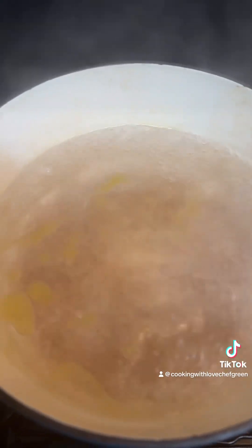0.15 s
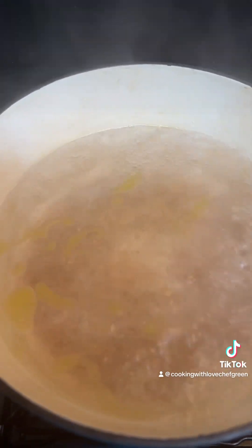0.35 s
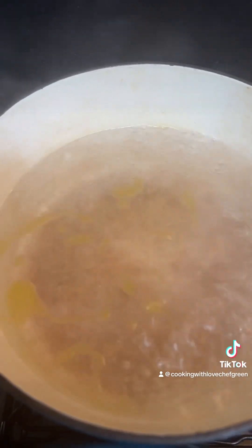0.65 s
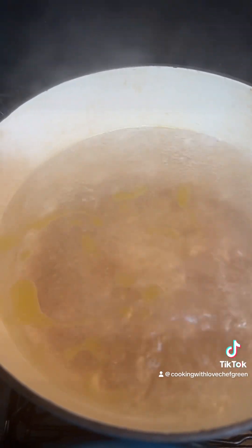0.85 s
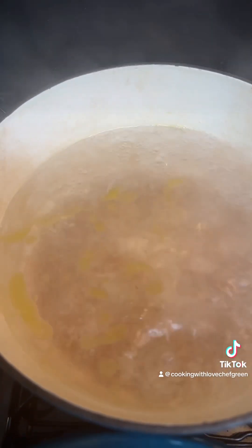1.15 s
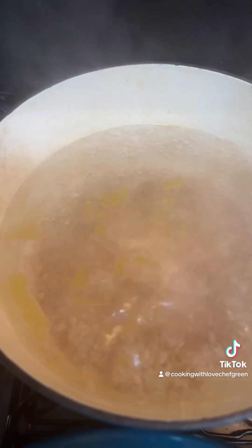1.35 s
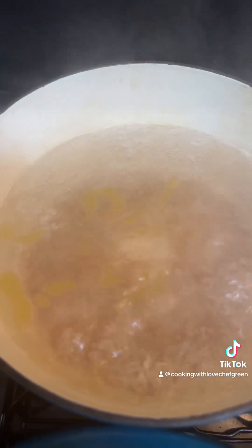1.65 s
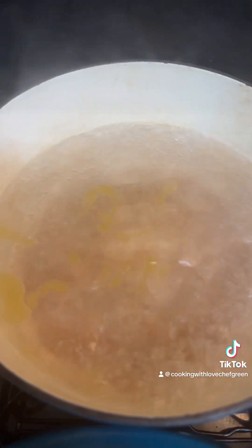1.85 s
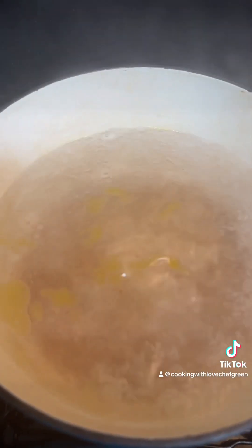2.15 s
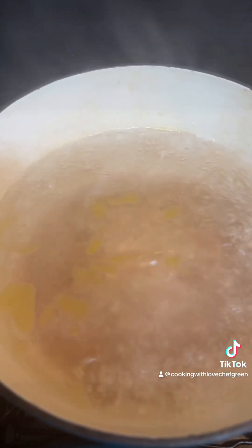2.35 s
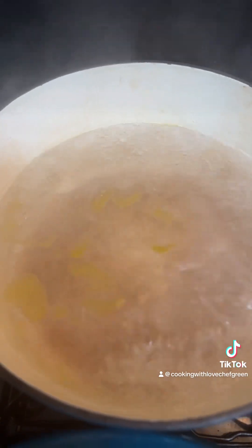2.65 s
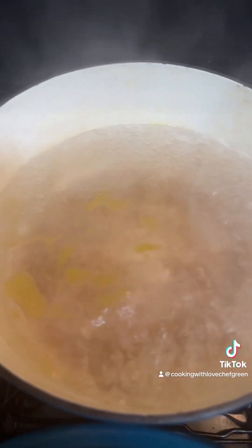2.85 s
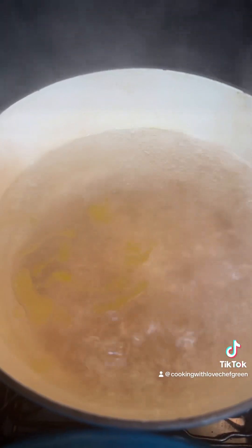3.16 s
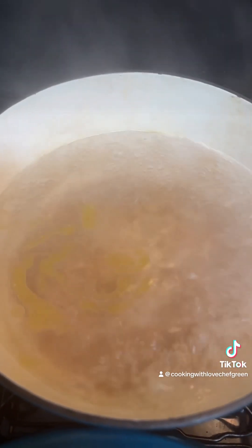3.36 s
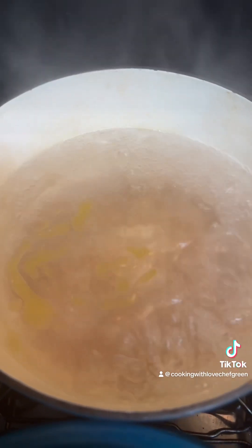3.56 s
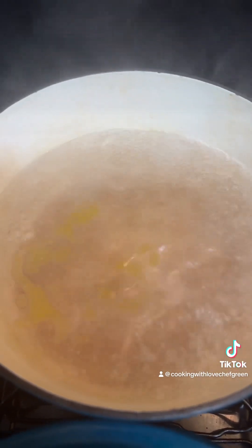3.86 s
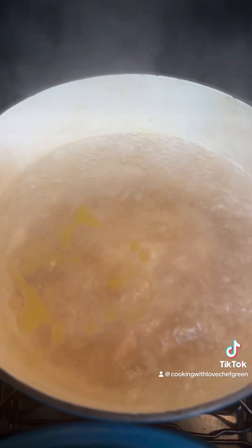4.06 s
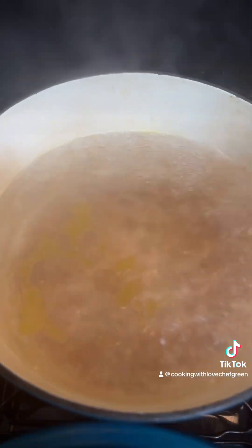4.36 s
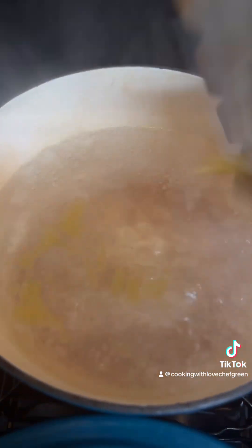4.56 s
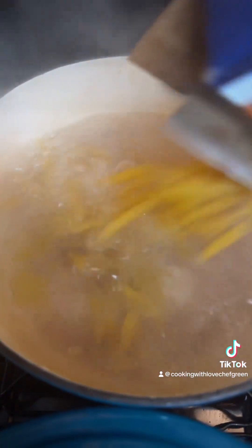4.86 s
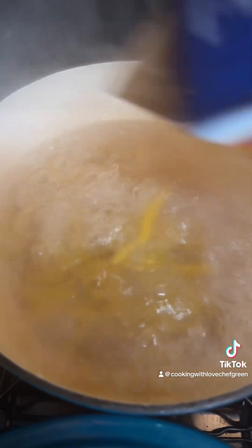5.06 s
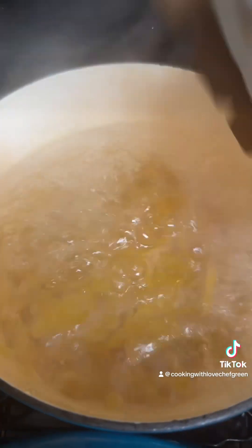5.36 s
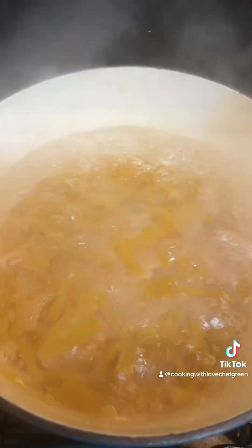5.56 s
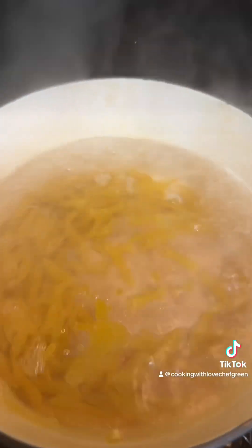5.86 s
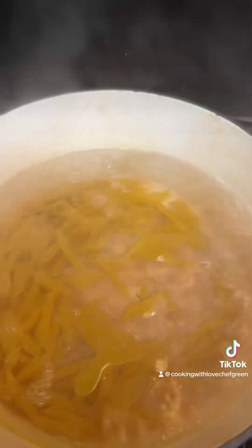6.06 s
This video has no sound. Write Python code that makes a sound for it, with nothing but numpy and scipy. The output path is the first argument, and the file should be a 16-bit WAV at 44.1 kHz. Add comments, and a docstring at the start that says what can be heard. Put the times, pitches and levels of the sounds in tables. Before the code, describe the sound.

Cardboard knocks, scrapes and glassy pasta clicks over a low stove rumble, then one dense rattling pour, frothy bubbles and a few plops.

```python
"""Pouring pasta into a simmering pot

A pot of water simmers on a stove while fingers tap and rub a cardboard box of dry pasta and the pieces shift.
Random tiny impacts sound the box through its resonances; knocks, pings, slips and a swipe are placed one by one.
The pasta then rushes out in dense rattles, clicks, short rings and rising bubbles, and the water froths.
A few last pieces plop in and droplets spit; filtered noise, bubbles and steady tones make the stove and hum."""
import sys
import numpy as np
from scipy import signal
from scipy.fft import rfft, irfft, next_fast_len
from scipy.io import wavfile
from scipy.ndimage import map_coordinates

SR = 44100
rng = np.random.default_rng(int(sys.argv[2]) if len(sys.argv) > 2 else 0)


def waveform_to_disk(signal):
    """Save audio, clipped to [-1, 1], as 16-bit WAV at the path in sys.argv[1]."""
    frames = np.transpose(np.atleast_2d(signal))
    scaled = np.clip(frames, -1, 1) * 32767
    samples = np.round(scaled).astype(np.int16)
    wavfile.write(sys.argv[1], SR, samples)


N = 273508  # length in samples

# All levels are relative: each layer is trimmed further where it is built.
# Burner rumble and simmer colour. Each row: frequency in Hz, level in dB.
STOVE_COLOUR = [(12, -46), (20, -22), (43, -15), (65, -3.5), (123, -3), (204, -19.5), (241, -15),
                (410, -17), (472, -23.5), (513, -17.5), (1150, -28.5), (1260, -27), (2670, -31),
                (13500, -39), (16000, -53)]
# Steam hiss colour. Each row: frequency in Hz, level in dB.
STEAM_COLOUR = [(3000, -24), (5500, 0), (9000, -6), (12000, -11), (14000, 2), (16000, -10)]
# Hum of a kitchen appliance. Each row: frequency in Hz, rms level in dB.
HUM_TONES = [(60, -54.5), (120, -58.5), (240, -70), (266, -66)]

# Finger strokes over the box. Each row: start in seconds, length in seconds, rub on the card in dB,
# flexing of the walls in dB, scratch in dB.
STROKES = [(0, 0.012, -25.5, -37.5, -43), (0.081, .04, -26.5, -56, -43.5), (.19, 0.056, -48, -47, -45),
           (0.359, 0.038, -32.5, -49, -48.5), (0.486, 0.061, -36.5, -43, -48),
           (.555, 0.033, -28.5, -45, -47), (0.611, 0.055, -32, -36.5, -40.5),
           (0.862, 0.038, -37.5, -41, -42.5), (0.977, 0.028, -41, -56, -55),
           (1.128, 0.071, -36.5, -37, -45.5), (1.217, 0.074, -38.5, -38, -60),
           (1.364, 0.079, -37, -38.5, -56), (1.509, 0.027, -40, -35.5, -54), (1.88, 0.017, -38, -43, -54),
           (1.982, 0.0084, -38.5, -39.5, -58), (2.115, 0.032, -33.5, -38.5, -51.5),
           (2.24, 0.068, -30, -35, -41), (2.323, 0.059, -34, -42, -45), (2.385, .045, -28, -47, -35),
           (2.432, 0.042, -17.5, -32, -28.5), (2.51, 0.069, -33, -42, -47),
           (2.717, 0.11, -38.5, -45, -50.5), (2.85, 0.052, -35.5, -51, -40.5),
           (3.678, .015, -43.5, -54, -58), (3.82, 0.017, -31.5, -39, -45), (4.014, .012, -43.5, -58, -57),
           (4.095, 0.016, -28, -43, -48), (4.167, 0.02, -31.5, -42, -49), (4.271, 0.043, -35, -57, -55)]
STROKE_ATTACK_S, STROKE_RELEASE_S = 0.017, 0.032  # time for 10 dB
# Pasta shifting in the held box. Each row: time in seconds, rub level in dB.
SHIFTING = [(0, -40.5), (.65, -46.5), (.76, -52), (1.2, -41.5), (1.65, -47), (2.05, -42.5), (2.55, -45),
            (2.9, -52), (3.03, -66), (3.55, -62), (3.8, -43), (4.3, -57), (4.5, -75)]
SHIFT_FLEX_DB, SHIFT_SCRATCH_DB = -10.5, -12.5  # relative to the rub
# Resonances of the closed box. Each row: frequency in Hz, width in Hz, level in dB.
BOX_MODES = [(342, 100, -1), (745, 77, 0.5), (1010, 96, -2.5), (1370, 33, 0), (1510, 71, -1.5),
             (1770, 230, -0.5), (2020, 210, -4), (2610, 460, -4.5)]
# Broad colour of the card. Each row: frequency in Hz, level in dB.
CARD_COLOUR = [(100, -37.5), (350, -3), (500, -2), (750, 2.5), (1400, -2.5), (2200, -4), (3100, -14),
               (5000, -14.5), (9000, -48)]
# Dull colour of the bending walls. Each row: frequency in Hz, level in dB.
FLEX_COLOUR = [(30, -32), (70, -1), (140, -0.5), (300, -1.5), (480, -12), (900, -32.5), (2000, -56)]
# Bright colour of the scratched surface. Each row: frequency in Hz, level in dB.
SCRATCH_COLOUR = [(1200, -41), (2800, -3.5), (4000, 4.5), (5500, 3.5), (7500, -3.5), (10000, -2),
                  (12000, -14.5), (16000, -5.5)]

# Knocks of fingers and pasta on the box. Each row: start in seconds, knock in dB, wall swing in dB,
# swing pitch in Hz, crack in dB, time for the chatter to fall 60 dB in seconds.
KNOCKS = [(.001, -27, -27, 81, -48, 0.093), (.057, -38, -48, 200, -32.5, 0.048),
          (.1, -26, -39, 300, -45, 0.1), (.114, -37, -25.5, 94, -44, .055),
          (0.32, -27, -31, 354, -39, 0.076), (0.49, -26, -22.5, 384, -50, 0.026),
          (.523, -9, -17.5, 380, -22.5, 0.023), (0.529, -28.5, -22, 79, -56, 0.19),
          (.607, -43, -45, 250, -26.5, 0.072), (.638, -44, -23.5, 314, -29, 0.032),
          (0.817, -33.5, -55, 750, -42, 0.069), (.873, -33, -44, 200, -34.5, 0.055),
          (.929, -19, -15, 401, -32, .11), (.935, -20.5, -13, 131, -37, .11),
          (.963, -32, -48, 200, -31, .042), (1.064, -38.5, -32.5, 278, -61, .065),
          (1.125, -38, -22, 423, -53, 0.047), (1.181, -19.5, -14, 2700, -21.5, 0.08),
          (1.193, -18, -24, 196, -42, 0.14), (1.474, -32.5, -44, 300, -52, .02),
          (1.512, -31.5, -40, 270, -42, 0.066), (1.755, -38, -52, 200, -38.5, 0.079),
          (1.798, -28.5, -31.5, 177, -36, 0.21), (1.954, -36, -28, 764, -53, 0.039),
          (2.044, -31, -28.5, 760, -44, 0.038), (2.11, -27, -33, 197, -49, 0.081),
          (2.274, -25.5, -25, 163, -50, 0.25), (2.296, -13, -23.5, 108, -21.5, 0.051),
          (2.323, -16.5, -36, 300, -27, 0.043), (2.376, -32, -26.5, 136, -49, .05),
          (2.438, -19, -42, 200, -31, .07), (2.46, -11, -18, 750, -25.5, 0.062),
          (2.537, -24.5, -49, 300, -33, 0.037), (2.671, -28.5, -48, 745, -34, 0.046),
          (2.74, -26, -35.5, 129, -54, 0.028), (2.912, -25, -27, 400, -35.5, 0.063),
          (3.517, -40, -48, 199, -50, 0.038), (3.637, -40.5, -36, 119, -54, 0.1),
          (3.724, -26.5, -23, 453, -26.5, .032), (3.729, -22, -14.5, 613, -41, 0.1),
          (3.736, -26, -23, 111, -48, 0.066), (3.872, -37, -41, 400, -40, 0.039),
          (4.261, -32, -59, 300, -44, 0.025), (4.381, -20.5, -24, 800, -35, 0.16),
          (4.435, -14, -2, 1020, -25, 0.039), (6.048, -33, -51, 900, -46, 0.15)]
# Hard pieces of pasta ringing against each other. Each row: start in seconds, level in dB, pitch in Hz.
PINGS = [(.183, -42, 9800), (.444, -50, 10100), (.833, -42.5, 9840), (2.55, -44, 10500),
         (3.875, -33.5, 10200), (4.72, -26, 9800), (4.845, -21, 3780), (4.905, -36, 10300),
         (4.925, -26, 12800), (4.943, -26, 11100)]
# A flap slipping over the card in jerks. Each row: start in seconds, level in dB.
FLAP_SLIPS = [(1.866, -45), (1.879, -41), (1.892, -36), (1.9, -37), (1.914, -36), (1.931, -38),
              (1.953, -39), (1.975, -48), (1.992, -38)]
# A finger sliding along an edge and slowing. Each row: time in seconds, pitch in Hz, level in dB.
SWIPE_PATH = [(2.829, 1933, -54), (2.86, 1591, -39.5), (2.883, 1165, -27), (2.9, 891, -39),
              (2.916, 620, -31), (2.938, 477, -51)]
# Resonances of the stiff card edge. Each row: frequency in Hz, width in Hz, level in dB.
EDGE_MODES = [(3900, 200, 6), (5160, 300, -1), (6260, 350, -1)]

# Colour of pasta rattling down the box. Each row: frequency in Hz, level in dB.
RATTLE_COLOUR = [(150, -44), (420, -10.5), (650, 2.5), (1050, -6.5), (1400, -2.5), (2400, -5), (3300, -19),
                 (6000, -19), (12000, -66)]
# Resonances of the open box. Each row: frequency in Hz, width in Hz, level in dB.
OPEN_BOX_MODES = [(700, 220, -4), (1004, 33, 8), (1930, 67, -5), (2650, 82, -3)]
# Colour of pasta clicking on pasta. Each row: frequency in Hz, level in dB.
CLICK_COLOUR = [(700, -17), (1700, 4), (3500, 6.5), (4600, 1.5), (7000, -1), (9000, -4), (10200, 1.5),
                (11500, -24), (13500, -10), (16000, -29)]
# Low colour of pasta plunging into water. Each row: frequency in Hz, level in dB.
PLUNGE_COLOUR = [(40, -40), (110, -8.5), (160, -4.5), (290, 2.5), (500, -6.5), (1200, -23)]
FULL_S, THINNING_S, EMPTY_S = 4.45, 4.636, 4.955  # full flow, start of thinning, box empty
SWELL_DB_PER_S, TRAIL_DB_PER_S = 138, 130
EMPTY_DROP_DB, EMPTY_DROP_S = 7.5, 0.0094
FROTH_DB, FROTH_DB_PER_S = -35.5, 72  # level as the box empties, then the fall as the water settles

# Last pieces dropping into the water. Each row: start in seconds, plop in dB, tick in dB,
# bubble pitch in Hz, second bubble pitch in Hz.
PLOPS = [(5.025, -26, -31.5, 1420, 800), (5.114, -30, -41, 710, 257), (5.164, -28.5, -51, 1264, 387)]
# Colour of their splash. Each row: frequency in Hz, level in dB.
PLOP_COLOUR = [(100, -22), (250, -2), (600, 0.5), (1300, -3.5), (1800, -14), (2400, -9.5), (4000, -20),
               (10000, -42)]
PLOP_T60_S, SECOND_BUBBLE_S = 0.091, 0.0061  # splash decay, delay of the second bubble
# Splashed droplets spitting. Each row: start in seconds, level in dB.
SPITS = [(5.083, -38), (5.162, -35.5), (5.214, -42.5), (5.255, -42), (5.265, -45), (5.379, -43.5),
         (5.742, -46.5), (5.76, -52)]
# Colour of a spit. Each row: frequency in Hz, level in dB.
SPIT_COLOUR = [(500, -18), (2000, 4), (6000, 0), (11000, -4), (14000, 2), (16000, -5)]

# Decay of the kitchen's echo. Each row: frequency in Hz, time to fall 60 dB in seconds.
KITCHEN_DECAY = [(150, 0.56), (800, 0.24), (3000, 0.25), (12000, 0.17)]
TOP_HZ = 15950  # band limit of the phone


def amp(db):
    """Decibels to gain."""
    return 10 ** (np.asarray(db) / 20)


def unit(x):
    """Scale to rms 1."""
    return x / np.sqrt(np.mean(x ** 2) + 1e-20)


def along(points, hz):
    """Read (Hz, value) points on a log frequency axis."""
    f, v = np.transpose(points)
    return np.interp(np.log(hz + 1), np.log(f), v)


def curves(rows):
    """One value per sample for each column after the time."""
    s, *cols = np.transpose(rows)
    return [np.interp(np.arange(N) / SR, s, c) for c in cols]


def wobble(rate):
    """A smooth random curve, rate knots a second."""
    knots = rng.standard_normal(int(N * rate / SR) + 4)
    return map_coordinates(knots, [np.arange(N) * rate / SR])


def add(track, s, sound):
    """Mix a sound into the track at time s."""
    part = track[max(0, round(s * SR)):][:len(sound)]
    part += sound[:len(part)]


def body(spectrum, modes=(), size=8192):
    """Causal impulse response of energy 1: a broad colour with resonances standing on it."""
    hz = np.fft.rfftfreq(size, 1 / SR)
    peaks = 1 + sum(amp(db) ** 2 * 4 / (1 + (2 * (hz - f) / width) ** 2) for f, width, db in modes)
    # folding the cepstrum onto positive times gives minimum phase: the energy comes as early as it can
    cepstrum = irfft(np.log(amp(along(spectrum, hz)) * np.sqrt(peaks)))
    cepstrum[1:size // 2] *= 2
    cepstrum[size // 2 + 1:] = 0
    response = irfft(np.exp(rfft(cepstrum)))[:size // 2]
    return response / np.linalg.norm(response)


def through(x, response):
    """Sound x played through an impulse response."""
    return signal.fftconvolve(x, response)[:N]


def high_pass(x, hz):
    """A gentle second-order bass cut."""
    return signal.sosfilt(signal.butter(2, hz, "high", fs=SR, output="sos"), x)


def contacts(rate, spread_db):
    """Random tiny impacts of uneven size, rate a second, rms 1."""
    chance, size, sign = rng.random(N), rng.standard_normal(N), rng.choice([-1, 1], N)
    impacts = sign * amp(spread_db * np.clip(size, -2, 2))
    return unit((chance < rate / SR) * impacts)


def grains(start_s, end_s, count, pitch_hz, octaves, cycles, rise=0, spread_db=4):
    """Short rings of random pitch and size, rms 1 while they last; bubbles rise in pitch, pasta does not."""
    t = np.arange(SR // 32) / SR
    start_time = start_s + (end_s - start_s) * rng.random((count, 1))
    start = (SR * start_time).astype(int)
    pitch, size = rng.standard_normal((count, 2)).T[:, :, None]
    turns = np.minimum(pitch_hz * 2 ** (octaves * pitch), SR / 3) * t
    age = np.minimum(turns / cycles, 2)
    level_db = spread_db * np.minimum(size, 2) - 27 * age
    rings = amp(level_db) * np.sin(2 * np.pi * turns * (1 + rise * age))
    track = np.bincount(np.abs(start + np.arange(len(t))).ravel(), rings.ravel(), N)[:N]
    return unit(track) * np.sqrt((end_s - start_s) * SR / N)


def stove():
    """The burner rumbles, the water simmers with tiny bursting bubbles, an appliance hums."""
    rumble = amp(-47.0 + 0.11 * wobble(6)) * through(rng.standard_normal(N), body(STOVE_COLOUR))
    steam = amp(-59) * through(contacts(rate=9000, spread_db=6.5), body(STEAM_COLOUR))
    bubbles = grains(0, N / SR, count=1100, pitch_hz=2470, octaves=1.1, cycles=9.0, rise=.08)
    simmer = amp(-68.0) * bubbles
    t = np.arange(N) / SR
    hum = np.zeros(N)
    for hz, db in HUM_TONES:
        # the phase drifts a little
        hum += amp(db) * np.sqrt(2) * np.sin(2 * np.pi * hz * t + .5 * wobble(4.6))
    return rumble + steam + simmer + hum


def strokes():
    """Gains of rub, flex and scratch: each stroke swells, holds and fades over the faint shifting of the pasta."""
    t = np.arange(N) / SR
    shift_db, = curves(SHIFTING)
    power = amp(np.array([shift_db, shift_db + SHIFT_FLEX_DB, shift_db + SHIFT_SCRATCH_DB])) ** 2
    for s, length, *levels_db in STROKES:
        before, after = np.maximum(s - t, 0), np.maximum(t - s - length, 0)
        fade = before / STROKE_ATTACK_S + after / STROKE_RELEASE_S  # in steps of 10 dB
        near = fade < 6
        power[:, near] += amp(np.array(levels_db)[:, None] - 10 * fade[near]) ** 2
    return np.sqrt(power)


def handling():
    """Fingers rub the card: dense slips sound the box, bend its walls and scratch its surface."""
    rub_gain, flex_gain, scratch_gain = strokes()
    grip = amp(2.6 * wobble(70))
    slips = grip * contacts(rate=2000, spread_db=2.5)
    rub = through(slips * rub_gain * amp(-4.0), body(CARD_COLOUR, BOX_MODES))
    bends = contacts(rate=810, spread_db=7)
    flex = through(bends * flex_gain * amp(-1.5), body(FLEX_COLOUR))
    fibres = grip * contacts(rate=5000, spread_db=2.0)
    scratch = through(fibres * scratch_gain * amp(-1.5), body(SCRATCH_COLOUR))
    return rub + flex + scratch


def knocks():
    """Each knock is a brief crushing blow, a swing of the card wall and a dying chatter of the pieces inside."""
    out = np.zeros(N)
    t = np.arange(SR // 4) / SR
    bright = body(SCRATCH_COLOUR)
    for s, knock_db, swing_db, swing_hz, crack_db, t60 in KNOCKS:
        chatter = rng.standard_normal((2, len(t))) * (rng.random(len(t)) < .15) * 2.08
        chatter *= amp(-60 * t / t60)
        blow = rng.standard_normal(len(t)) * (1 - np.exp(-t / 0.0015)) * np.exp(-t / 0.003)
        # every spot on the box rings its modes at other strengths
        spot = [(hz, width, db + 4 * rng.standard_normal()) for hz, width, db in BOX_MODES]
        hit = 1.57 * blow + chatter[0] * (1 - np.exp(-t / 0.001))
        add(out, s, amp(knock_db) * signal.fftconvolve(hit, body(CARD_COLOUR, spot)))
        crack = 0.49 * blow + chatter[1] * amp(-60 * t / 0.49)
        add(out, s, amp(crack_db) * signal.fftconvolve(crack, bright))
        # the soft wall swings for only a few cycles
        turns = swing_hz * t
        swing = np.sin(2 * np.pi * turns) * (1 - np.exp(-turns / 0.12)) * np.exp(-turns / 0.75)
        add(out, s, amp(swing_db + 6.5) * swing)
    return out


def ring(hz, t60, scatter):
    """A short burst of narrow noise, as from several close modes."""
    t = np.arange(SR // 16) / SR
    modes = hz * (1 + scatter * rng.standard_normal((6, 1)))
    phase = rng.uniform(0, 2 * np.pi, (6, 1))
    tones = np.sin(2 * np.pi * modes * t + phase).sum(0)
    return tones * amp(-60 * t / t60) / np.sqrt(3)


def pings():
    """Hard pieces of pasta strike each other and ring, glassy and short."""
    out = np.zeros(N)
    for s, db, hz in PINGS:
        add(out, s, amp(db) * ring(hz, t60=0.038, scatter=0.034))
    return out


def flap_slips():
    """A flap jerks over the card: each slip chirps and ticks on the box."""
    out = np.zeros(N)
    tick = body(CARD_COLOUR, BOX_MODES)
    for s, db in FLAP_SLIPS:
        add(out, s, amp(db) * ring(hz=4700, t60=0.018, scatter=0.071))
        add(out, s, amp(db + 17) * tick)
    return out


def swipe():
    """A rough zip whose pitch falls as the finger slows, while the card edge hisses in its own modes."""
    hz, db = curves(SWIPE_PATH)
    ends = [SWIPE_PATH[0][0], SWIPE_PATH[-1][0]]
    sliding = np.interp(np.arange(N) / SR, ends, [1, 1], left=0, right=0)  # 1 during the swipe, else 0
    phase = 2 * np.pi * np.cumsum(hz * (1 + .11 * wobble(1200))) / SR
    tone = np.sin(phase) + amp(-14) * np.sin(2 * phase)
    zip_tone = unit(tone * amp(2.3 * wobble(400)))
    edge = through(contacts(rate=2500, spread_db=7), body(SCRATCH_COLOUR, EDGE_MODES))
    return sliding * (amp(db) * zip_tone + amp(-32.0 + 0.52 * db) * edge)


def flow(lag_s, thinning_db_per_s):
    """Level of the stream in dB: it swells, holds, thins, drops as the box runs empty and trails off."""
    t = np.arange(N) / SR
    swell = SWELL_DB_PER_S * np.maximum(FULL_S + lag_s - t, 0)
    thinning = thinning_db_per_s * np.clip(t - THINNING_S, 0, EMPTY_S - THINNING_S)
    after = np.maximum(t - EMPTY_S, 0)
    drop = EMPTY_DROP_DB * np.minimum(after / EMPTY_DROP_S, 1)
    return -swell - thinning - drop - TRAIL_DB_PER_S * after


def pour():
    """Pieces tumble down the box; a moment later they click on each other and plunge into the frothing water."""
    rattle_db = flow(lag_s=0, thinning_db_per_s=39)
    plunge_db = flow(lag_s=.05, thinning_db_per_s=18)
    click_db = flow(lag_s=.065, thinning_db_per_s=18)
    span = FULL_S - .2, EMPTY_S + .5
    tumbling = contacts(rate=1400, spread_db=2) * amp(rattle_db - 21.0)
    rattle = through(tumbling, body(RATTLE_COLOUR, OPEN_BOX_MODES))
    clumps = amp(0.93 * wobble(120))
    clicking = clumps * contacts(rate=3300, spread_db=1.0) * amp(click_db - 27.5)
    clicks = through(clicking, body(CLICK_COLOUR))
    clacks = grains(*span, count=800, pitch_hz=2697, octaves=.45, cycles=45, spread_db=4.5)
    clacks *= amp(click_db - 28.5)
    tinks = grains(*span, count=2600, pitch_hz=10500, octaves=0.19, cycles=110, spread_db=5.5)
    tinks *= amp(click_db - 32.5)
    plunging = contacts(rate=700, spread_db=2.5) * amp(plunge_db - 31.0)
    plunge = through(plunging, body(PLUNGE_COLOUR))
    bubbles = grains(*span, count=600, pitch_hz=1000, octaves=0.399, cycles=27.6, rise=0.091)
    bubbles *= amp(rattle_db - 22.5)
    # froth builds until the box is empty, then settles
    since_empty = np.arange(N) / SR - EMPTY_S
    froth_db = np.minimum(SWELL_DB_PER_S * since_empty, -FROTH_DB_PER_S * since_empty) + FROTH_DB
    froth = grains(*span, count=2000, pitch_hz=1600, octaves=1.1, cycles=14, rise=.08)
    froth *= amp(froth_db)
    return rattle + clicks + clacks + tinks + plunge + bubbles + froth


def bubble(hz, cycles, rise):
    """A trapped pocket of air rings and rises in pitch."""
    turns = hz * np.arange(SR // 16) / SR
    age = np.minimum(turns / cycles, 3)
    tone = np.sin(2 * np.pi * turns * (1 + rise * age))
    return tone * amp(-25 * age) * (1 - np.exp(-turns))


def plops():
    """A late piece ticks on the surface, splashes and traps two bubbles."""
    out = np.zeros(N)
    t = np.arange(SR // 4) / SR
    water, bright = body(PLOP_COLOUR), body(CLICK_COLOUR)
    for s, plop_db, tick_db, first_hz, second_hz in PLOPS:
        splash, tick = rng.standard_normal((2, len(t)))
        splash *= amp(plop_db + 3 - 60 * t / PLOP_T60_S) * (1 - np.exp(-t / 0.0023))
        tick *= amp(tick_db - 60 * t / 0.1)
        add(out, s, signal.fftconvolve(splash, water))
        add(out, s, signal.fftconvolve(tick, bright))
        add(out, s, amp(plop_db + 2.5) * bubble(first_hz, cycles=15, rise=.08))
        add(out, s + SECOND_BUBBLE_S, amp(plop_db - 5.0) * bubble(second_hz, cycles=11, rise=.06))
    return out


def spits():
    """Droplets burst with a tiny bright tick of fast-dying noise."""
    out = np.zeros(N)
    t = np.arange(SR // 32) / SR
    for s, db in SPITS:
        add(out, s, amp(db - 60 * t / 0.032) * rng.standard_normal(len(t)))
    return through(out, body(SPIT_COLOUR))


def kitchen(x):
    """Hard nearby walls answer; the treble dies first, and the small box throws little bass at them."""
    hz, t, z = signal.stft(rng.standard_normal(SR // 2), SR, nperseg=256)
    decay = amp(-60 * t / along(KITCHEN_DECAY, hz)[:, None])
    tail = signal.istft(z * decay, SR, nperseg=256)[1]
    tail = np.pad(tail, (SR // 256, 0))  # the echo starts about 4 ms late
    return through(high_pass(x, hz=263), tail / np.linalg.norm(tail))


def scene():
    """The box and the pasta above the simmering pot."""
    box = handling() + knocks() + pings() + flap_slips() + swipe()
    near = box + pour() + plops() + spits()
    return (stove() + near + amp(-13) * kitchen(near))[None]


def record(dry):
    """The phone rounds off the highest peaks, cuts the deepest bass and keeps nothing above its band limit."""
    rounded = dry / (1 + np.abs(dry / .5) ** 6) ** (1 / 6)
    trimmed = high_pass(high_pass(rounded, hz=33), hz=33)
    m = next_fast_len(N + SR // 2)
    in_band = np.fft.rfftfreq(m, 1 / SR) < TOP_HZ
    return irfft(rfft(trimmed, m) * in_band, m)[..., :N]


dry = scene()
out = record(dry)
waveform_to_disk(out)
```